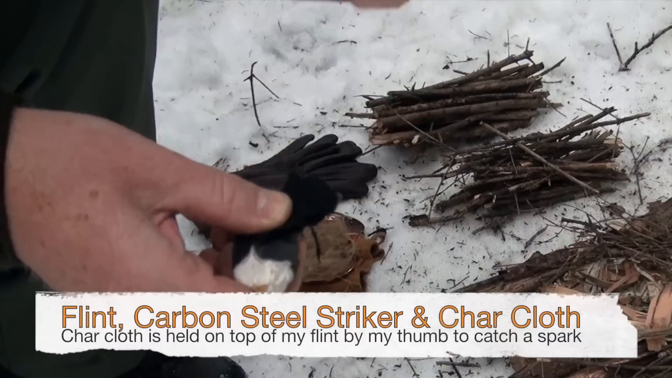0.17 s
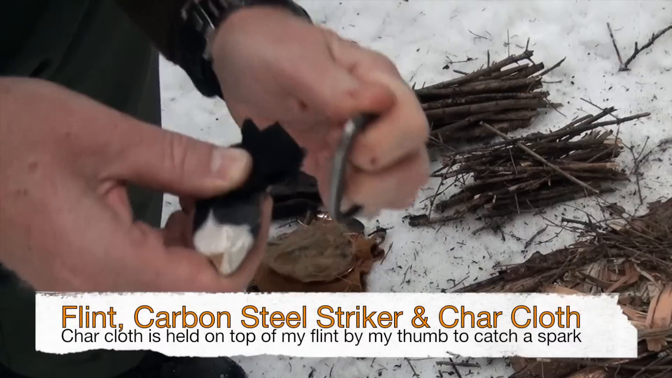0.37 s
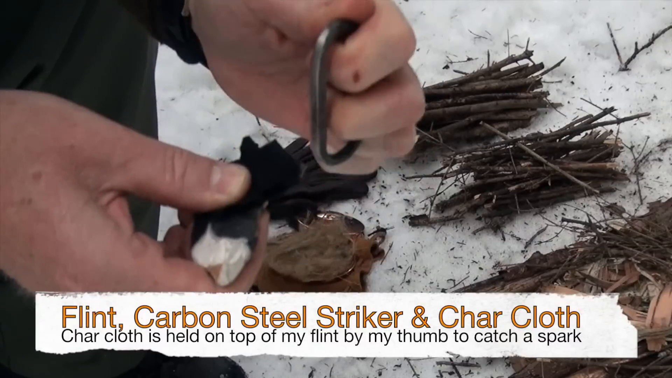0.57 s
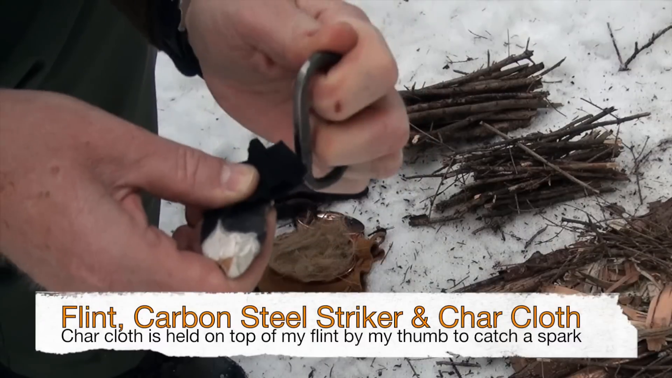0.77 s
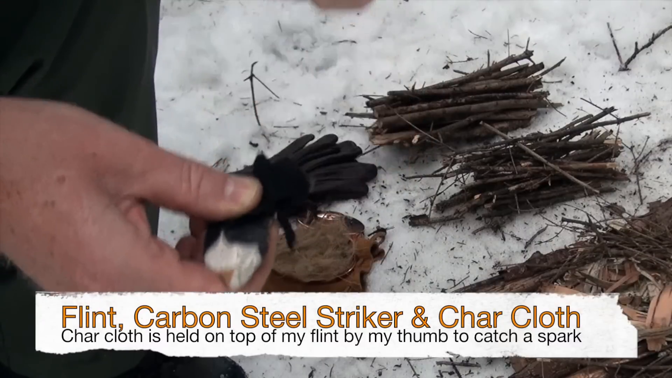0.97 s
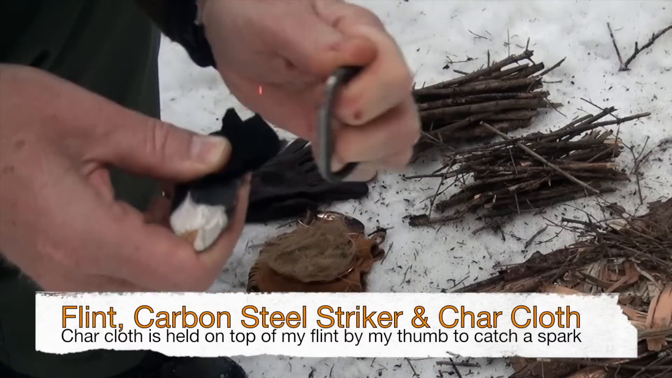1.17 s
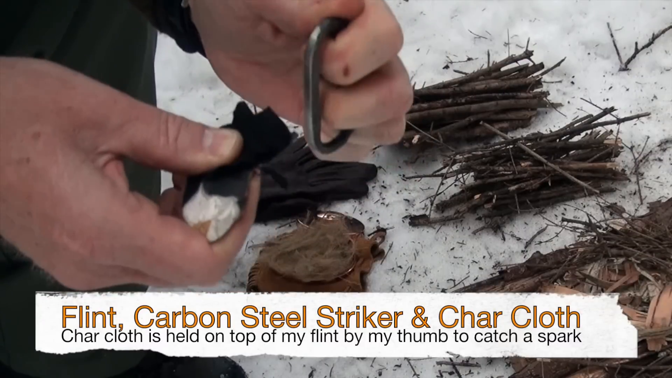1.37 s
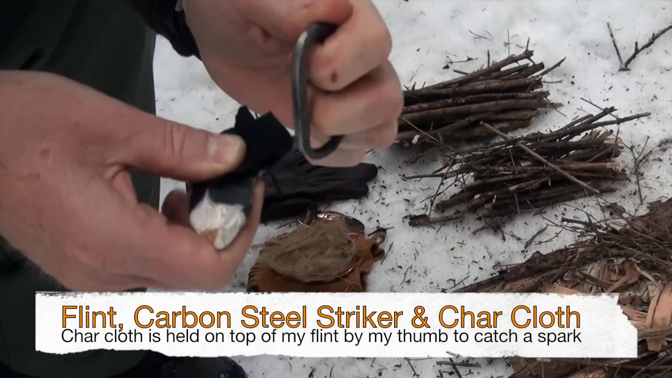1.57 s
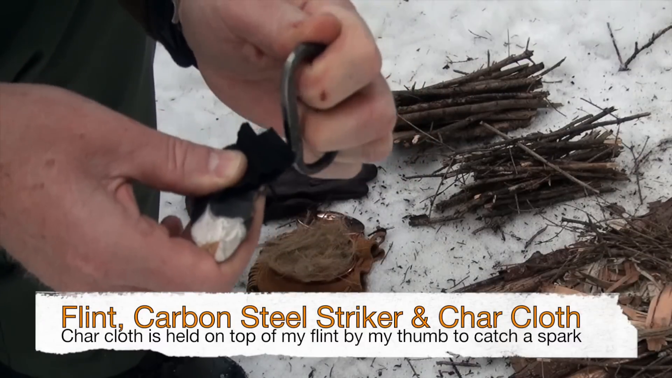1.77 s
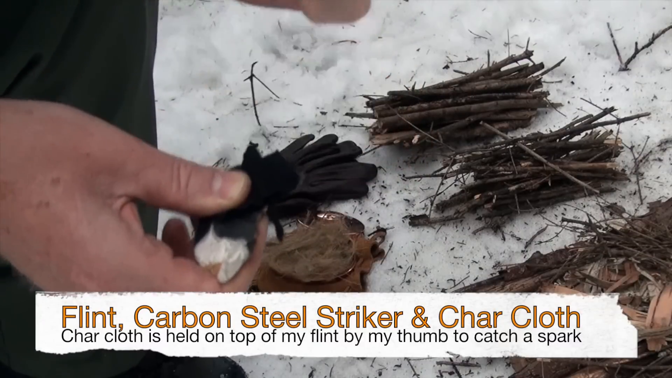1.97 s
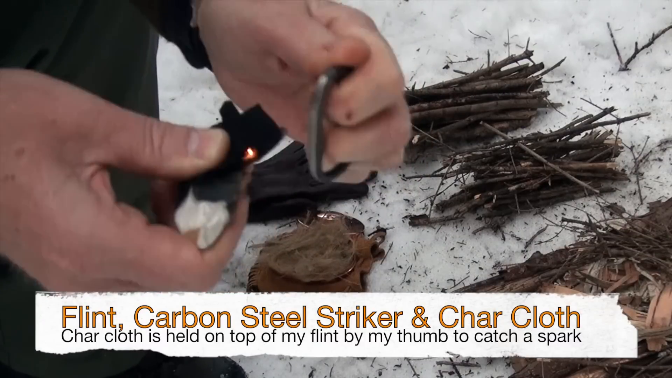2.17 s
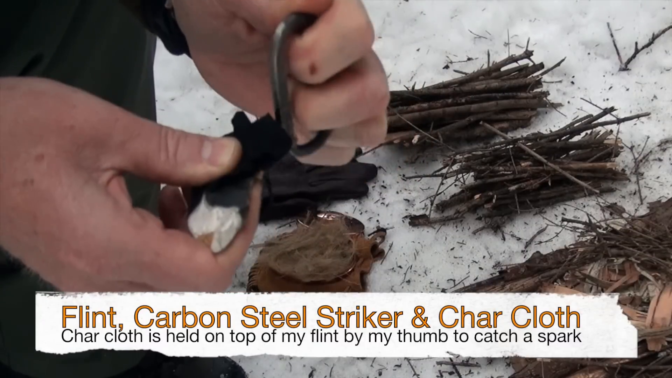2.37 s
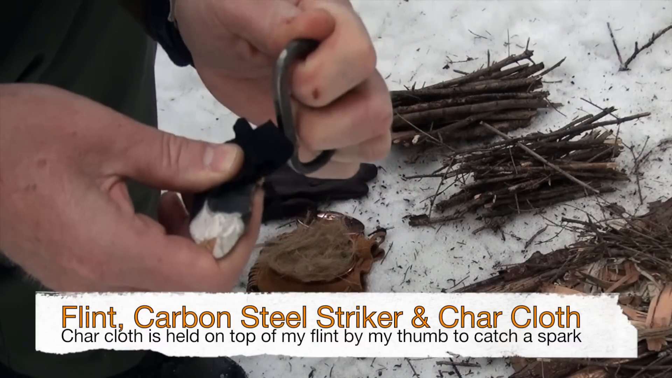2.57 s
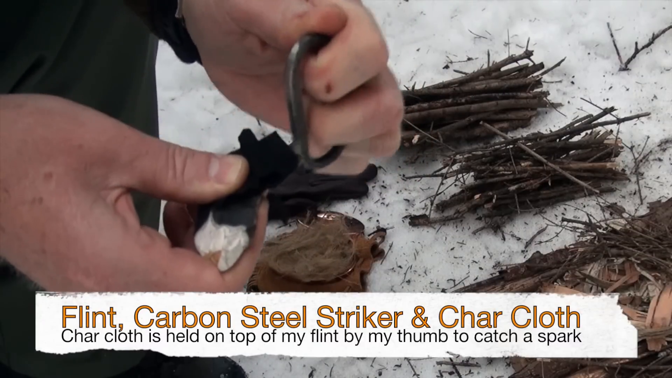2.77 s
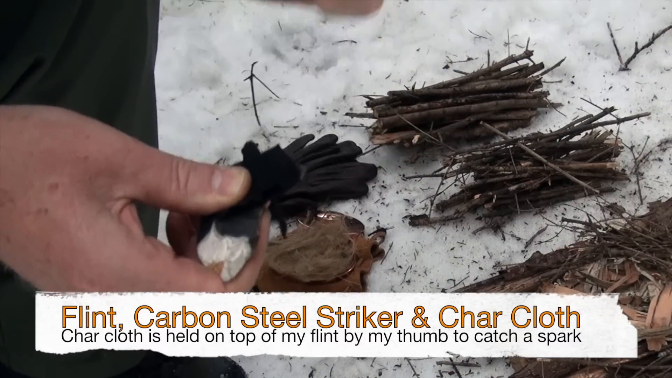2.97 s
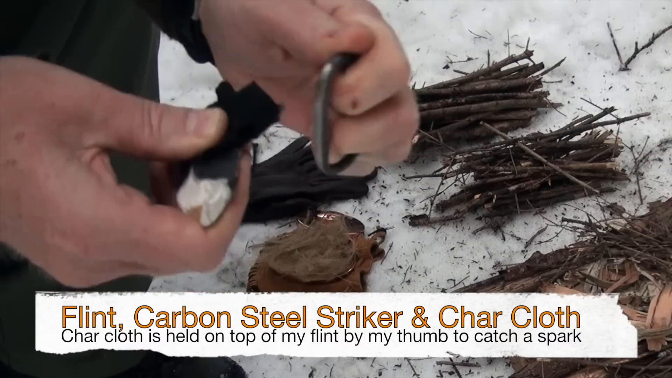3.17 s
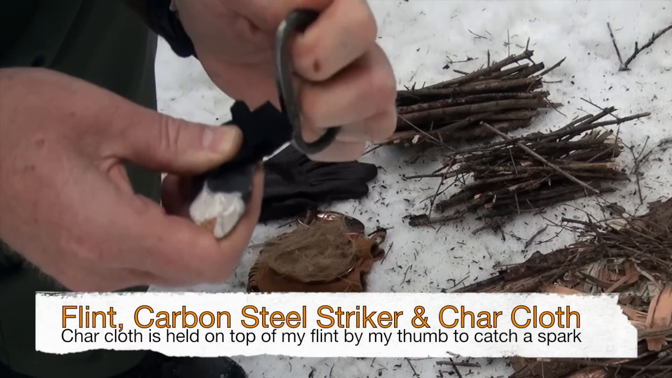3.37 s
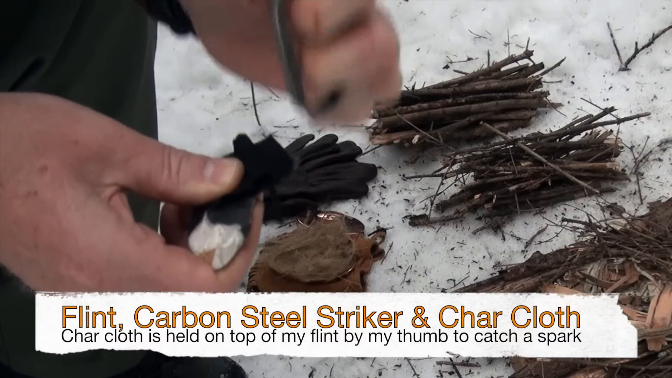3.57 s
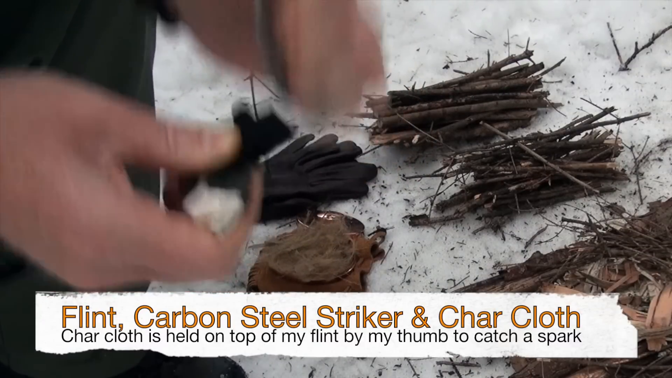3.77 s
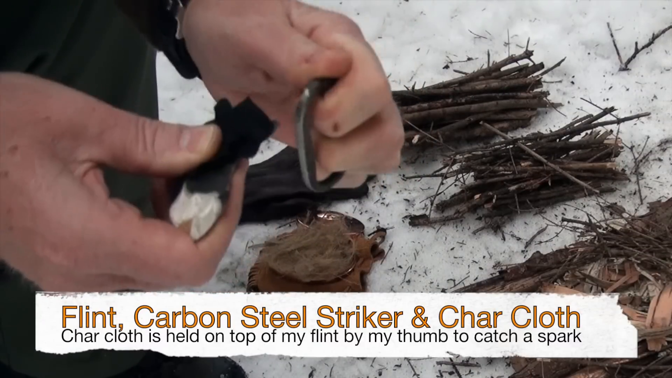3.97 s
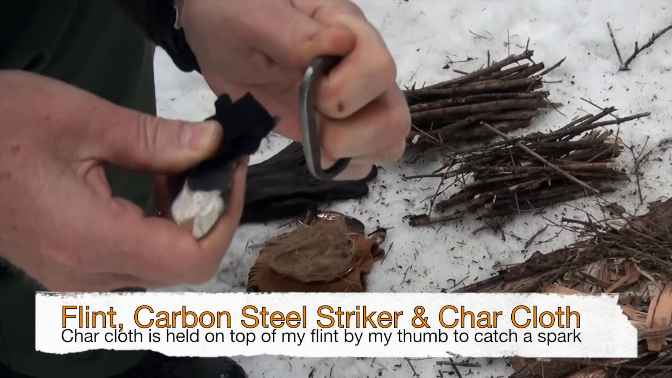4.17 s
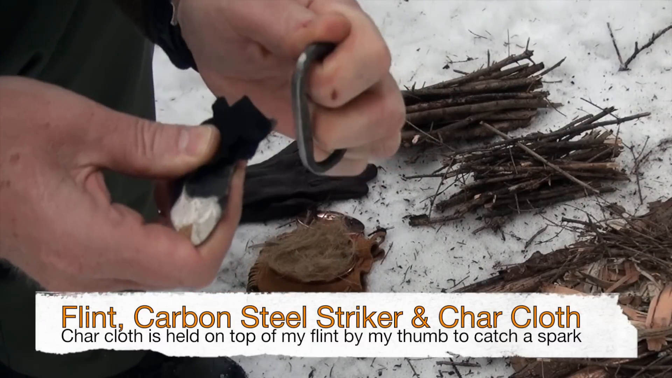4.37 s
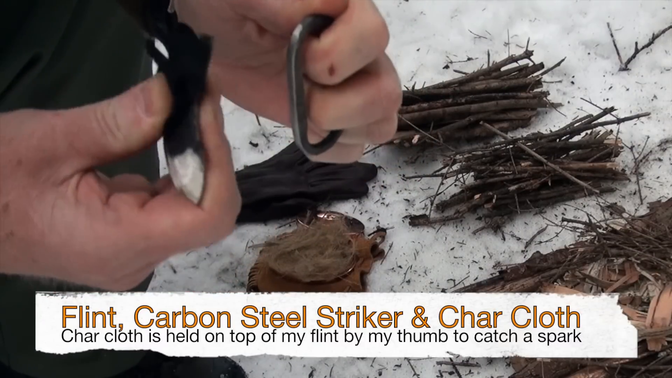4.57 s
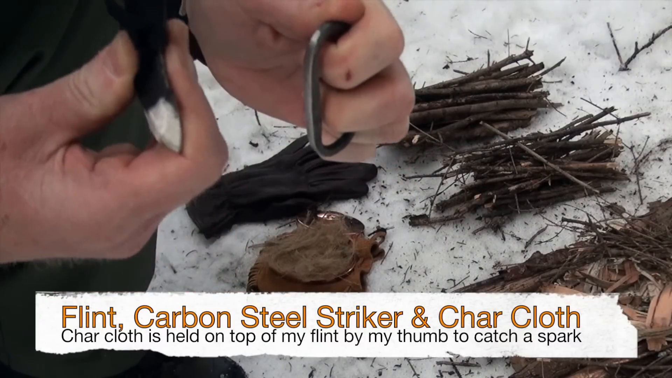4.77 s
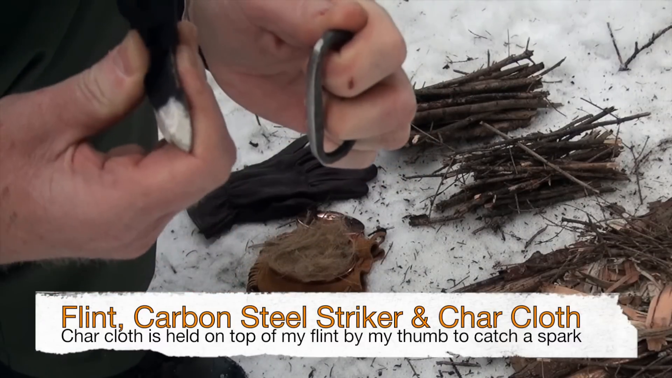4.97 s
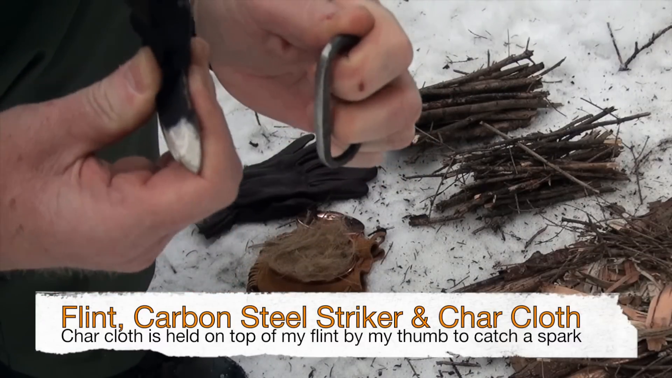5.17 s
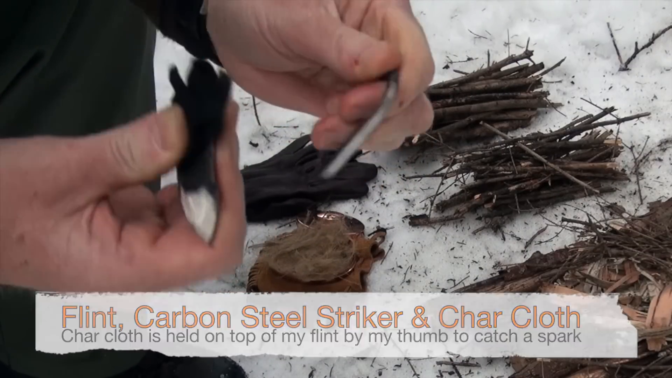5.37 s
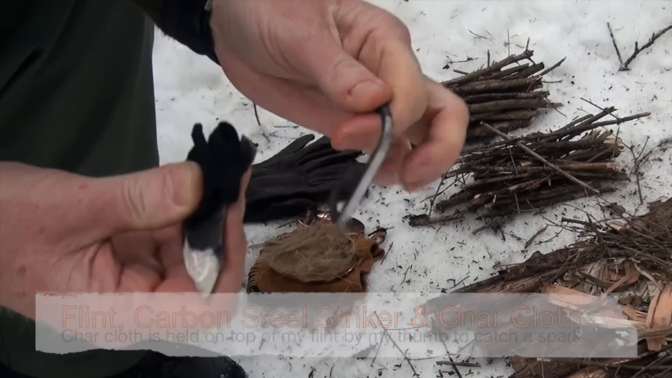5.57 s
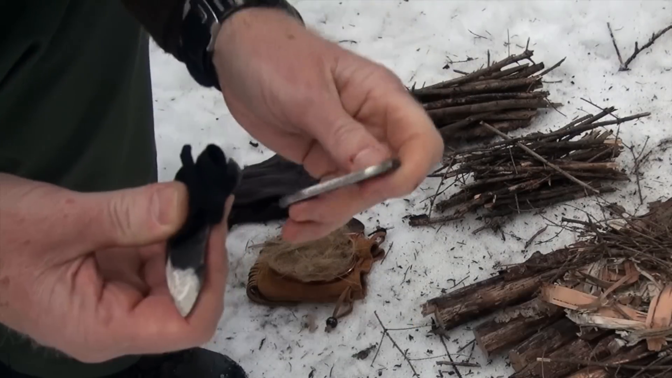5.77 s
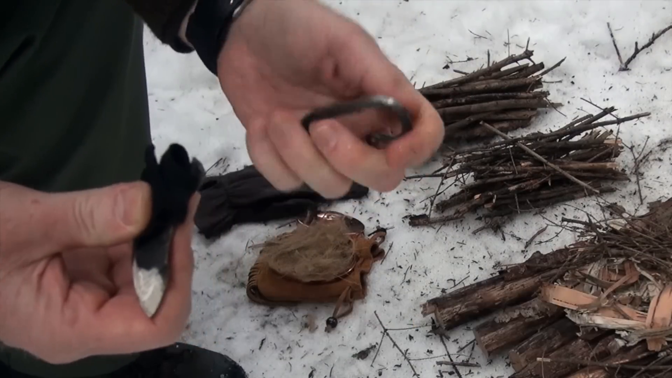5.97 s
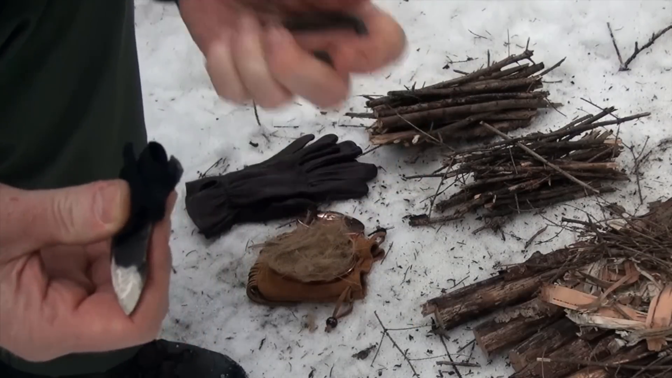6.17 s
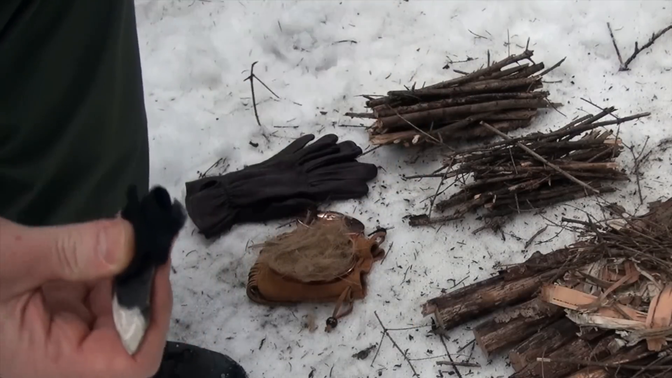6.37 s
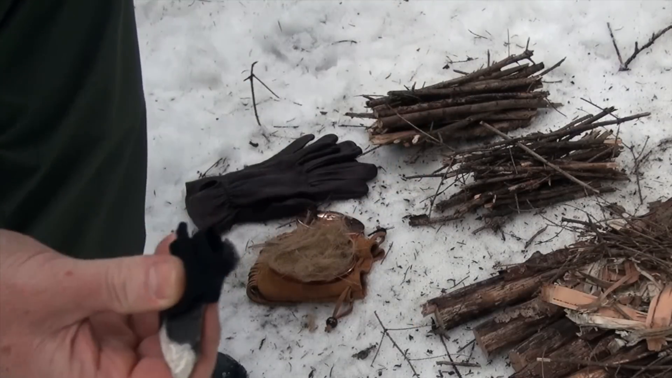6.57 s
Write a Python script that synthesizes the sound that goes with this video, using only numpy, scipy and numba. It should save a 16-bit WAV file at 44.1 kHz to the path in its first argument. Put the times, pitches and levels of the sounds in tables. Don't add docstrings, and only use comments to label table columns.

```python
import sys
import numpy as np
from scipy import signal
from scipy.fft import rfft, irfft, next_fast_len
from scipy.io import wavfile
from scipy.ndimage import uniform_filter1d
from numba import njit

SR = 44100
rng = np.random.default_rng(int(sys.argv[2]) if len(sys.argv) > 2 else 0)


def how_loud(loudness_db):
    steps = np.asarray(loudness_db, float) / 20
    return 10 ** steps


def wrap_up_sound(samples):
    columns = np.atleast_2d(samples).T
    tamed = np.clip(columns, -1, 1)
    steps = np.round(tamed * 32767).astype(np.int16)
    wavfile.write(sys.argv[1], SR, steps)


N = 291706

# t/s, level/dB, contact point along the bar [0-1], hardness [dB per octave], grip [damping re usual]
STRIKES = [
    (0.3246, 8.5, 0.52, 2.5, 0.93),
    (0.7706, -1, 0, -1, 0.82),
    (1.1085, 11.5, 0.95, -1.5, 0.74),
    (2.116, 8, 0.62, -2.5, 1.9),
    (3.1141, 8, 0.51, 0, 1.65),
    (3.8691, 10, 0.88, 6, 2.5),
]
# first touch/dB re blow, start level/dB, end level/dB, length/s, spray of chips/dB
SCRAPES = [(-40, -2, -8.5, 0.0097, -28.5), (-50, -7, -15, 0.0035, -59), (-35, -10, -3, .018, -23),
           (-62, -8.5, -4, 0.0091, -31.5), (-36, -5.5, -12.5, .014, -30.5), (-33, -10.5, -4, 0.017, -28)]
# f/Hz, width/Hz, level/dB at the curl, the middle, the far end
EDGE = [(2100, 450, 9, 2.5, -32), (2800, 650, 5, -1, -7), (4020, 480, -1, -8, -1), (4510, 350, 0, 1, -0.5),
        (5800, 340, -12, -33, -6), (6360, 170, -28, -2.5, -4), (8600, 164, -1, -1.5, 0),
        (9300, 400, -6, -9, 1), (10670, 520, -15, -8, 1.5), (14500, 400, -32, -7, -21),
        (15600, 400, -28, -31, -3)]


def unit(x):
    return x / np.sqrt(np.mean(x ** 2) + 1e-20)


def along(points, hz):
    f, v = np.transpose(points)
    return np.interp(np.log(hz + 1), np.log(f + 1), v)


def filtered(x, response):
    n = x.shape[-1]
    m = next_fast_len(n + 8192)
    return irfft(rfft(x, m) * response(np.fft.rfftfreq(m, 1 / SR)), m)[..., :n]


def modes(peaks):
    def ring(f):
        total = 0
        for k, (centre, width, db) in enumerate(peaks):
            resonance = 1j * f * width / (centre * centre - f * f + 1j * f * width)
            total = total + (-1) ** k * how_loud(db) * resonance
        return total

    top = np.abs(filtered(np.eye(1, 512)[0], ring)).max()
    return lambda f: ring(f) / top


def patches(shape, bins, frames):
    field = uniform_filter1d(rng.standard_normal(shape), size=bins, axis=0)
    return unit(uniform_filter1d(field, size=frames, axis=1))


def rush(spectrum, alike, patchy_db):
    z = signal.stft(rng.standard_normal((2, N)), nperseg=512)[2]
    z = z * how_loud(patchy_db * patches(z.shape[1:], 6, 14))
    pair = signal.istft(z, nperseg=512)[1][:, :N]

    def mid_side(hz):
        turn = np.arccos(np.clip(along(alike, hz), -1, 1)) / 2
        return how_loud(along(spectrum, hz)) * [np.cos(turn), np.sin(turn)]

    mid, side = filtered(pair, mid_side)
    return unit(np.array([mid + side, mid - side]))


def add(out, s, x):
    part = out[..., round(s * SR):][..., :x.shape[-1]]
    part += x[..., :part.shape[-1]]


def struck(body, point, hard_db=0, grip=1):
    peaks = []
    for hz, width, *dbs in body:
        db = np.interp(point, np.linspace(0, 1, len(dbs)), dbs)
        peaks.append((hz, width * grip, db + hard_db * np.log2(hz / 5000)))
    return peaks


def first_touch(t, db):
    return how_loud(db) * rng.standard_normal(len(t)) * (t < 0) * np.clip(1 + t / .0015, 0, 1) ** .3


def blow(t, lead, db, ring):
    chatter = rng.standard_normal(len(t)) * how_loud(-60 * t / .009) * (t > 0)
    push = (np.arange(len(t)) == lead) + .07 * chatter
    return how_loud(db) * filtered(push, modes(ring + [(4630, 1800, -15)]))


def scrape(t, start_db, end_db, length, edge):
    grit, size = rng.standard_normal((2, len(t)))
    slope_db = (end_db - start_db) * np.clip(t / length, 0, 1)
    leaving_db = -60 * np.clip(t - length, 0, 1) / 0.0082
    slide = how_loud(start_db + slope_db + leaving_db) * (t > 0)
    grains = slide * unit(grit * how_loud(3 * unit(uniform_filter1d(size, size=8))))
    return how_loud(-13.0) * filtered(grains, modes(edge + [(2045, 580, 0.5), (7050, 17000, -13.5)]))


def striker():
    # f/Hz, width/Hz, level/dB when struck at the curl, the middle, the far end
    steel = [(2070, 108, -10, -2.5, -19), (2800, 170, -22, -27, -35), (3280, 290, -6, -6, -13),
             (4130, 220, 5.5, -20, -20), (4680, 480, -12, -8, -4.5), (6050, 200, 1, -9.5, -11),
             (7400, 260, -28, -9.5, -7), (8500, 420, 2.5, 0.5, -12.5), (10500, 157, -25, -5, 0),
             (11600, 100, -17, -10, -29), (13520, 350, -36, -17.5, -7), (13800, 150, -29, -9, -28),
             (14440, 360, -43, -63, -3)]
    # t/s, level/dB, L-R/dB
    knock = (5.0808, -2, 4)
    # f/Hz, width/Hz, level/dB
    flint = [(2260, 380, 3.5), (2820, 450, 3), (7030, 420, 5.5), (11200, 870, 0.5), (14800, 450, -36)]
    # t/s, level/dB, hardness [dB per octave]
    taps = [
        (1.7283, -14, -1),
        (3.4708, -13.5, 1.5),
    ]
    # f/Hz, width/Hz, level/dB
    laid = [(2130, 170, 13), (3430, 260, 4.5), (4070, 280, 5), (6300, 350, -3), (8100, 400, -7),
            (10300, 1100, -10.5), (15300, 500, -16)]
    # first touch/dB re blow, start level/dB, end level/dB, length/s (negative: already leaving)
    light = (-51, -56, -15, -0.14)
    # f/Hz, extra L-R/dB
    aslant = [(1500, 3.5), (4000, 0), (9000, 1.5), (14000, 2.5)]
    strike_pan_db, tap_pan_db = 2.5, 1.8
    bright_hz, bright_grows = 11900, 0.77

    contacts = [(*knock, flint, flint, *light)]
    for (s, db, point, hard_db, grip), slide in zip(STRIKES, SCRAPES):
        ring = struck(steel, point, hard_db, grip)
        contacts.append((s, db, strike_pan_db, ring, struck(EDGE, point), *slide[:4]))
    for s, db, hard_db in taps:
        contacts.append((s, db, tap_pan_db, struck(laid, 0, hard_db), laid, *light))

    out, rasp, lead = np.zeros((2, N)), np.zeros(N), 128
    t = (np.arange(2600) - lead) / SR
    for s, blow_db, pan_db, ring, edge, bite_db, start_db, end_db, length in contacts:
        touch = np.diff(first_touch(t, blow_db + bite_db), prepend=0)
        scraped = scrape(t, start_db, end_db, length, edge)
        corner_hz = bright_hz * how_loud(bright_grows * max(blow_db, -3))

        def radiated(hz):
            return (1j * hz / (1080 + 1j * hz)) ** 3 / (1 + 1j * hz / corner_hz) ** 2

        heard = filtered(touch + blow(t, lead, blow_db, ring) + scraped, radiated)
        add(out, s - lead / SR, heard * how_loud([[pan_db / 2], [-pan_db / 2]]))
        add(rasp, s - lead / SR, scraped)
    return filtered(out, lambda hz: how_loud(along(aslant, hz) * [[.5], [-.5]])), rasp


def spray():
    # f/Hz, t60/s
    decay = [(1000, 0.22), (3000, 0.3), (7000, 0.3), (14000, 0.24)]
    # f/Hz, level/dB
    tint = [(900, -21), (1600, -10), (2500, -9.5), (4500, -6), (6600, -3), (8000, -9), (10500, -9),
            (12500, -11), (15800, -12), (16300, -40)]
    out = np.zeros((2, N))
    for (s, _, point, *_), (*_, db) in zip(STRIKES, SCRAPES):
        hz, t, z = signal.stft(rng.standard_normal((3, SR // 2)), SR, nperseg=256)
        tinge = 1
        for centre, width, mode_db in struck(EDGE, point):
            bump = np.exp(-((hz - centre) / max(width, 350)) ** 2)
            tinge = tinge + 0.47 * how_loud(1.8 * mode_db) * bump
        colour = how_loud(along(tint, hz)) * tinge
        fade = how_loud(-60 * t / along(decay, hz)[:, None]) * (1 - np.exp(-(t / 0.015) ** 2))
        gain = colour[:, None] * how_loud(2.2 * patches(z.shape[1:], 5, 4)) * fade
        tail = signal.istft(z * gain, SR, nperseg=256)[1]
        add(out, s, how_loud(db + 12.0) * (tail[0] + 0.19 * tail[1:]))
    return out


def trunks(x):
    out, t = np.zeros((2, N)), np.arange(SR // 2) / SR
    for s, *_ in STRIKES:
        fade = how_loud(-60 * t / 0.44) * (1 - np.exp(-(t / 0.02) ** 2))
        tail = rng.standard_normal((2, len(t))) * fade
        tail = tail / np.linalg.norm(tail[0])
        start = round(s * SR) - 200
        add(out, start / SR, signal.fftconvolve(x[None, start:start + 2600], tail, axes=1))
    return out


def grit_ticks():
    # t/s, peak level/dB
    nudges = [(.0214, -33), (.049, -32.5), (0.0684, -35.5), (1.74, -35), (2.4698, -43), (3.5464, -39),
              (3.5506, -31), (3.5714, -55), (6.4073, -31.5)]
    # t/s, peak
    # level/dB, f/Hz
    chips = [(0.409, -28, 5370), (1.2094, -34, 5680), (1.2894, -33, 5780), (2.2087, -20, 6600),
             (2.21, -25.5, 3200), (2.2672, -34, 7930), (2.4917, -39, 11500), (2.5034, -37, 10300),
             (2.512, -34, 10000), (2.5316, -31, 9720), (3.5584, -40, 8550), (4.2465, -45, 2580),
             (4.985, -38, 6980), (5.012, -31, 5400), (5.018, -38, 8000), (5.11, -36, 11600),
             (5.3105, -40, 8500), (5.329, -28, 7400), (5.3732, -37, 9500), (5.3994, -40, 6600),
             (5.4755, -39, 8300), (5.5114, -36, 3900), (5.5962, -31, 13200), (6.5886, -26.5, 3200)]
    ticks = [(s, db, 2150, .01) for s, db in nudges]  # Hz, s
    ticks += [(s, db, hz, .0045) for s, db, hz in chips]
    out, t = np.zeros(N), np.arange(1200) / SR
    for s, db, hz, length in ticks:
        envelope = how_loud(-18 * t / length) * (1 - np.exp(-t / (0.18 * length)))
        burst = rng.standard_normal(len(t)) * envelope
        click = filtered(burst, modes([(hz, 0.12 * hz, 0), (1.1 * hz, 1.8 * hz, -13)]))
        add(out, s, how_loud(db) * click / np.abs(click).max())
    return out * how_loud([[.8], [-.8]])


def squeak():
    middle_s, half_s, top_hz, top_db = 2.64, .09, 5530, -60
    sag_hz, fade_db = 550, 1
    off = ((np.arange(N) / SR - middle_s) / half_s) ** 2
    waver = unit(uniform_filter1d(rng.standard_normal((2, N)), size=150, axis=1))
    hz = top_hz - sag_hz * np.clip(off, 0, 2)
    phase = 2 * np.pi * np.cumsum(hz * (1 + .008 * waver[0])) / SR
    level = how_loud(top_db - fade_db * off + 3 * waver[1])
    return level * (np.sin(phase) + .8 * np.sin(2 * phase))


def sleeves():
    # t/s, half length/s, level/dB
    brushes = [(0.299, 0.019, -47), (1.072, 0.098, -49), (2.07, 0.11, -52.5), (2.518, 0.025, -49.5),
               (3.052, 0.098, -51.5), (3.835, 0.17, -53.5), (4.944, 0.1, -49.5), (5.782, 0.043, -66),
               (6.367, 0.063, -41), (6.56, 0.17, -45.5)]
    # f/Hz, level/dB per Hz
    cloth = [(710, -44), (1200, -2), (2430, -6.5), (2860, -6), (7490, -10), (12100, -18), (16000, -40)]
    t = np.arange(N) / SR
    power = sum(how_loud(2 * db) * np.exp(-((t - s) / half) ** 2) for s, half, db in brushes)
    return np.sqrt(power) * rush(cloth, [(1000, 0.94), (10000, 0.93)], patchy_db=-2.5)


def distance():
    # f/Hz, level/dB per Hz
    traffic = [(13, -45), (25, -22), (40, -16), (52, -7), (66, -2.5), (92, -2.5), (144, -2), (187, -10.5),
               (256, -12), (638, -6.5), (947, -9.5), (1400, -18.5), (2260, -22), (3250, -27.5),
               (5500, -120)]
    # f/Hz, level/dB per Hz
    air = [(1060, -1), (1800, -9.5), (2060, -11), (2920, -4), (3350, -2.5), (4880, -4.5), (5540, -5.5),
           (6020, -5.5), (9330, -11), (11700, -9.5), (15100, -12), (16000, -26)]
    # f/Hz, correlation [-1 to 1]
    alike = [(60, 1.0), (130, 1), (290, 0.91), (640, 0.84), (1410, -0.0059), (3100, -0.18), (6820, 0.28),
             (15000, 1)]
    # f/Hz, width/Hz, level/dB
    drone = [(67, 9.9, 0)]
    # f/Hz, L-R/dB
    lean = [(60, 0), (250, .2), (600, 1.5), (1500, 1.4), (5000, .5), (15000, .3)]
    breeze_s, breeze_db_per_s = 5.5, 3.5
    air_db = -48 + breeze_db_per_s * np.clip(np.arange(N) / SR - breeze_s, 0, None)
    both = how_loud(-37) * rush(traffic, alike, patchy_db=0.5)
    both += how_loud(air_db) * rush(air, alike, patchy_db=1.35)
    both += how_loud(-49) * unit(filtered(rng.standard_normal(N), modes(drone)))
    return filtered(both, lambda hz: how_loud(along(lean, hz) * [[.5], [-.5]]))


def scene():
    steel, rasp = striker()
    echo = how_loud(-27.5) * trunks(rasp + 0.42 * steel[0])
    return steel + echo + spray() + grit_ticks() + sleeves() + distance() + squeak()


@njit
def follow(want, fall, rise, g):
    out = np.empty_like(want)
    for i in range(len(want)):
        g += (want[i] - g) * (fall if want[i] < g else rise)
        out[i] = g
    return out


def low_pass(x):
    return signal.sosfilt(signal.butter(12, 16560, fs=SR, output="sos"), x)


def record(dry):
    power = np.abs(uniform_filter1d(np.mean(dry ** 2, axis=0), size=88))
    level_db = 10 * np.log10(power + 1e-12)
    slow_want = -.6 * np.clip(level_db + 10.5, 0, 40)
    quick_want = -.4 * np.clip(level_db + 16.0, 0, 40)
    slow_db = follow(slow_want, 1 / (0.0018 * SR), 1 / (.7 * SR), -2)
    quick_db = follow(quick_want, 1 / (0.0024 * SR), 1 / (.15 * SR), 0.)
    x = dry * how_loud(slow_db + quick_db)
    x = x / (1 + np.abs(x / .88) ** 6) ** (1 / 6)
    x = filtered(x, lambda hz: how_loud(-40 * np.clip((hz - 15780) / 200, 0, 1) ** 2))
    return low_pass(x)


dry = scene()
out = record(dry)
wrap_up_sound(out)
```